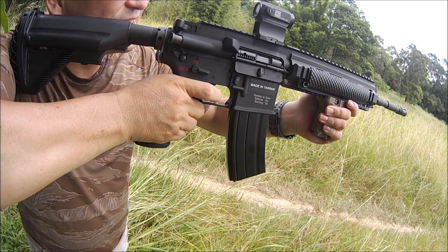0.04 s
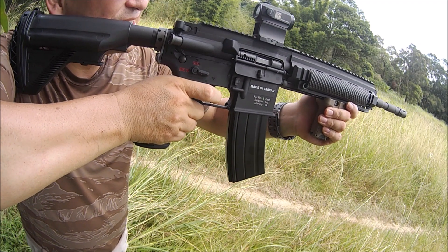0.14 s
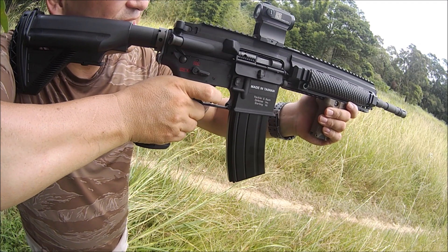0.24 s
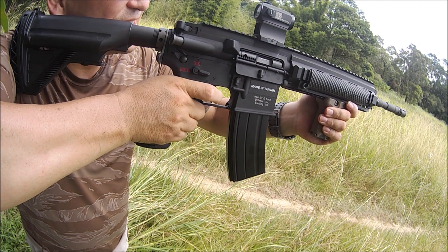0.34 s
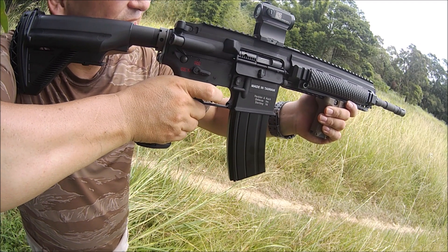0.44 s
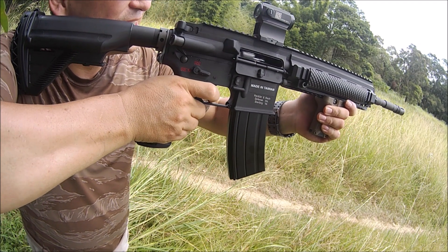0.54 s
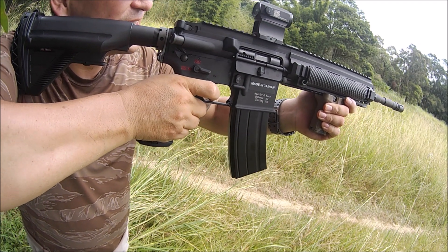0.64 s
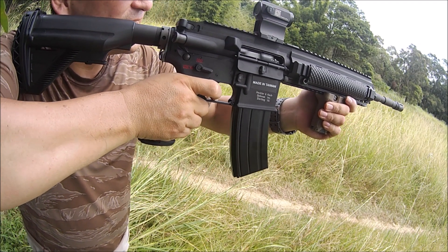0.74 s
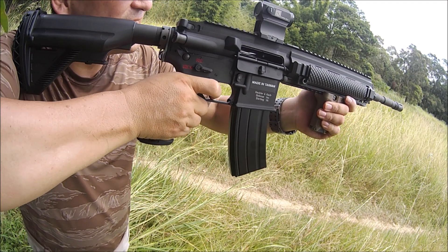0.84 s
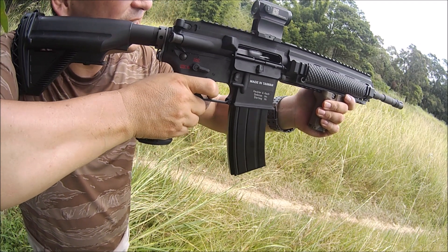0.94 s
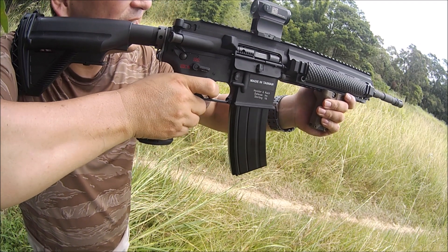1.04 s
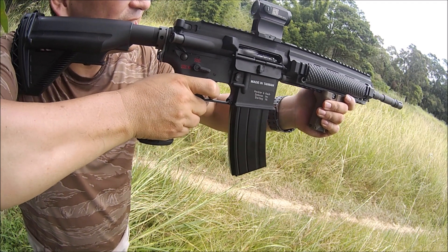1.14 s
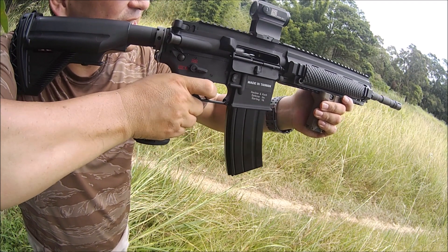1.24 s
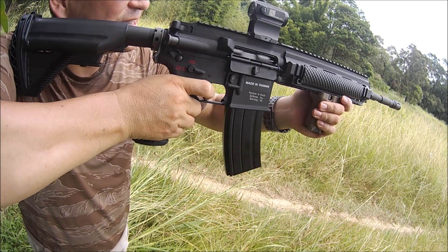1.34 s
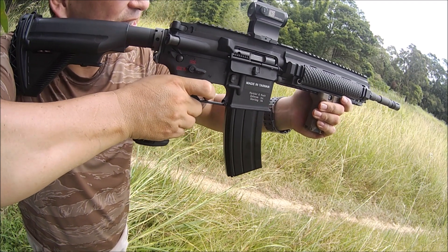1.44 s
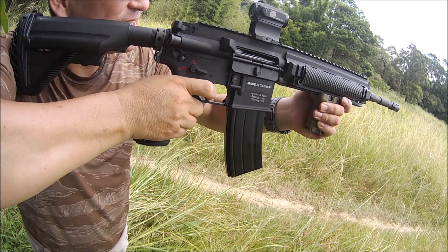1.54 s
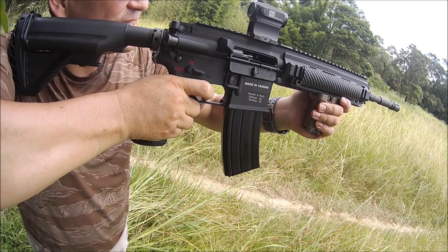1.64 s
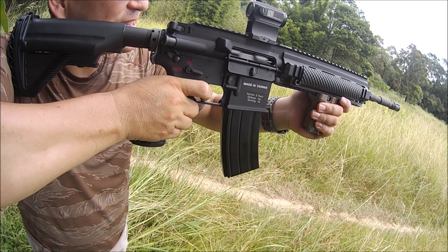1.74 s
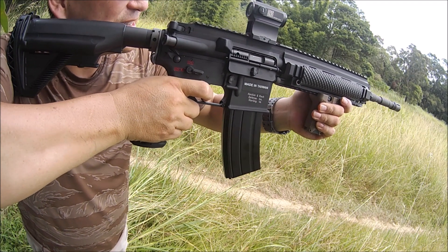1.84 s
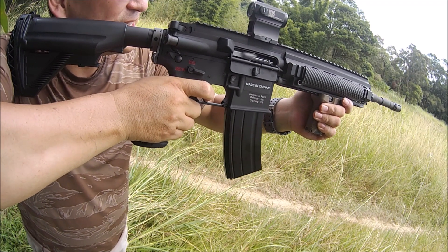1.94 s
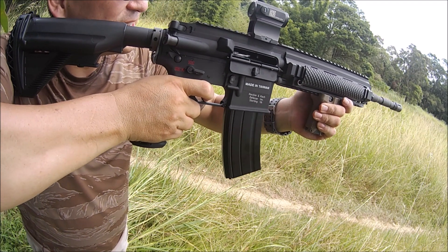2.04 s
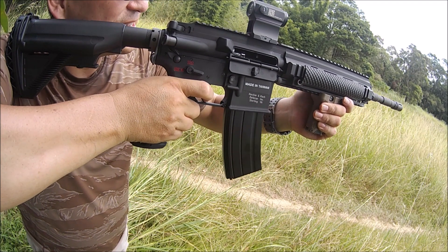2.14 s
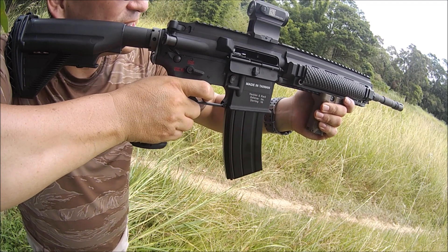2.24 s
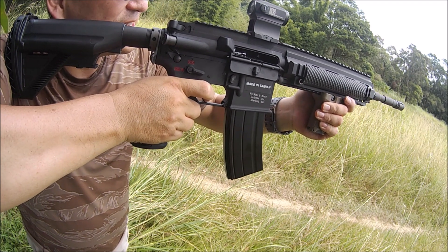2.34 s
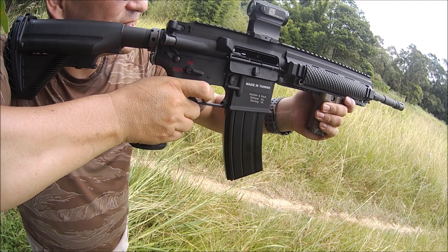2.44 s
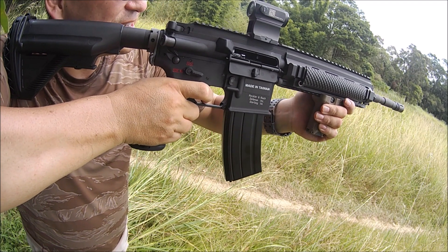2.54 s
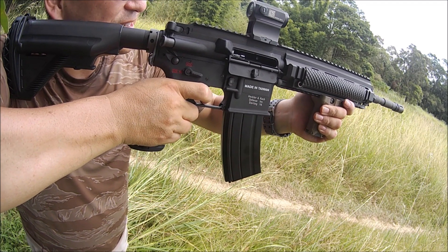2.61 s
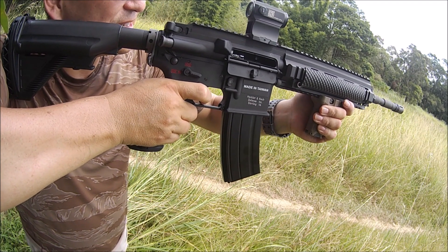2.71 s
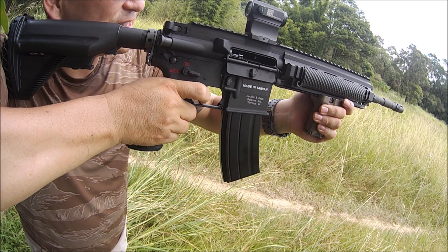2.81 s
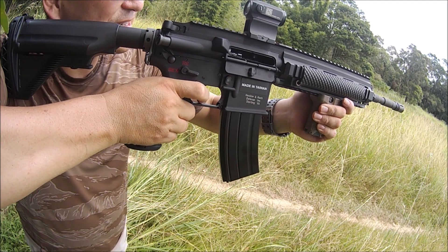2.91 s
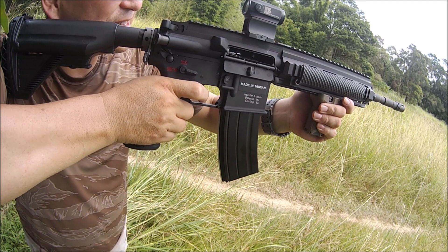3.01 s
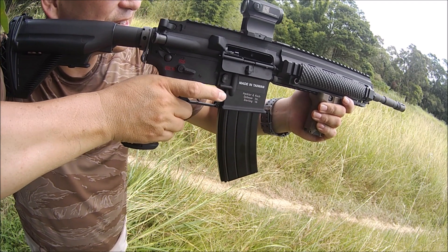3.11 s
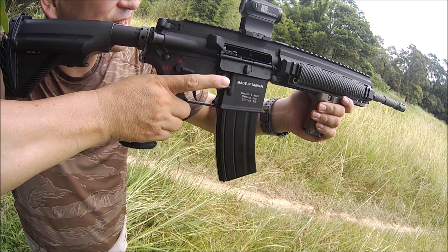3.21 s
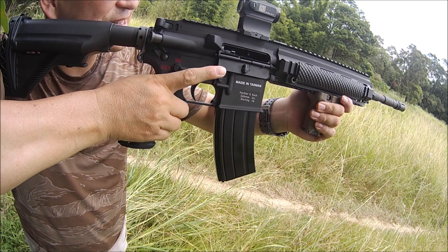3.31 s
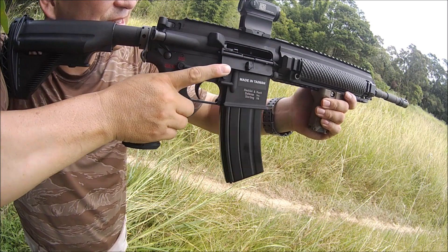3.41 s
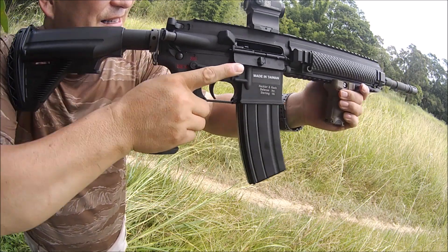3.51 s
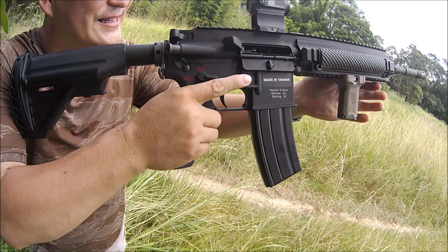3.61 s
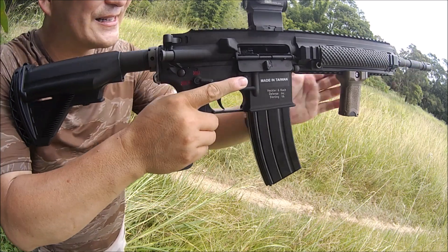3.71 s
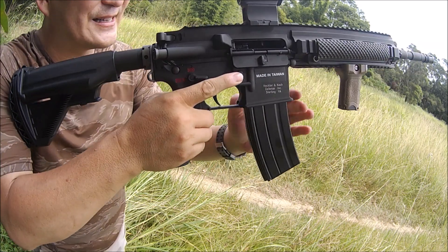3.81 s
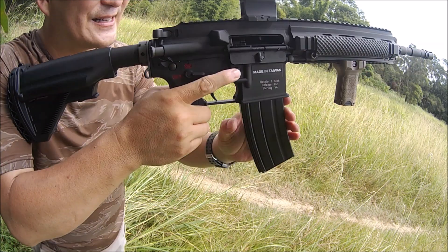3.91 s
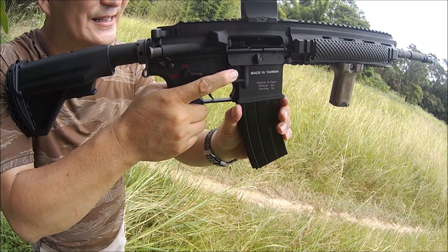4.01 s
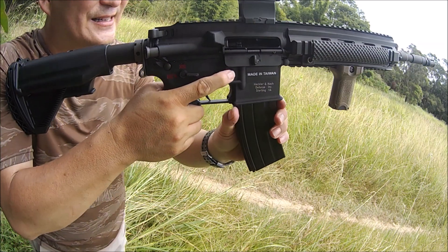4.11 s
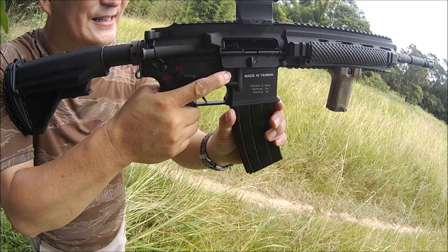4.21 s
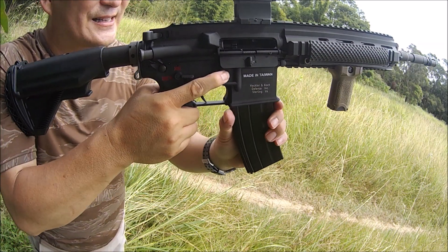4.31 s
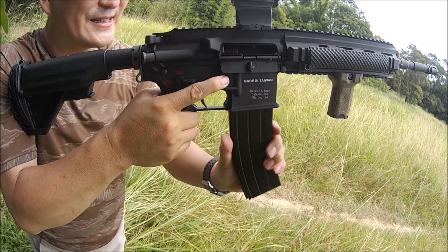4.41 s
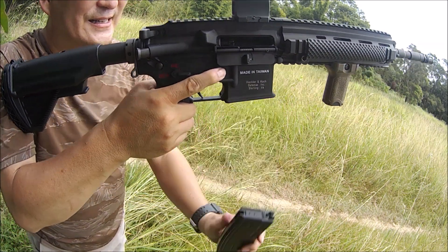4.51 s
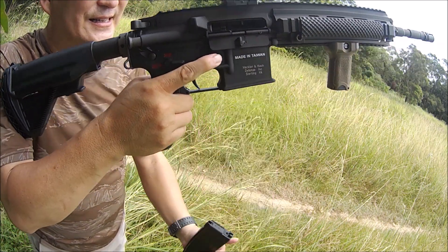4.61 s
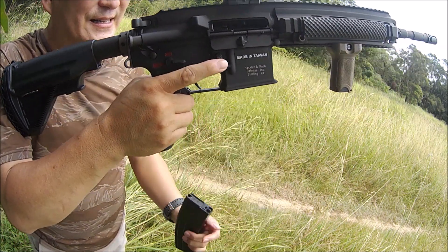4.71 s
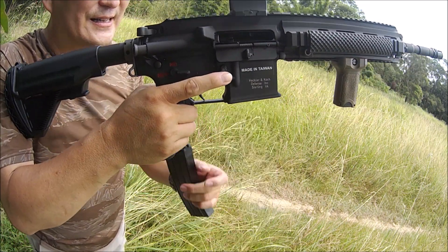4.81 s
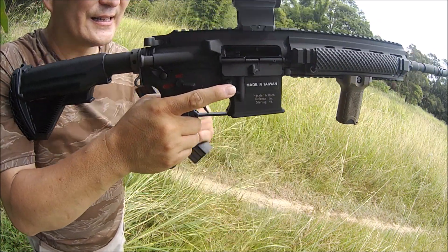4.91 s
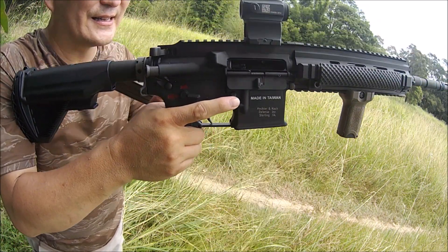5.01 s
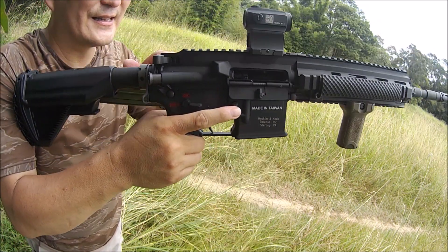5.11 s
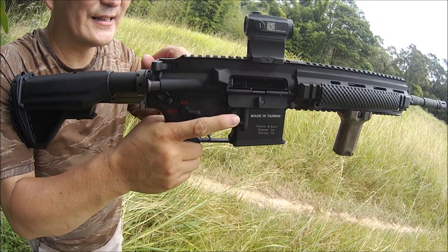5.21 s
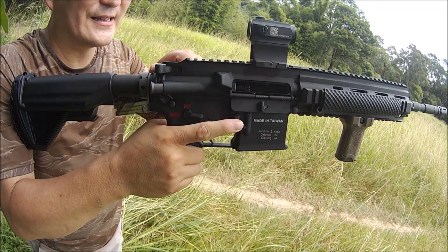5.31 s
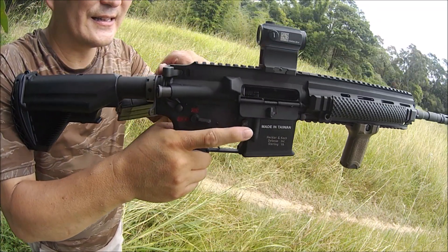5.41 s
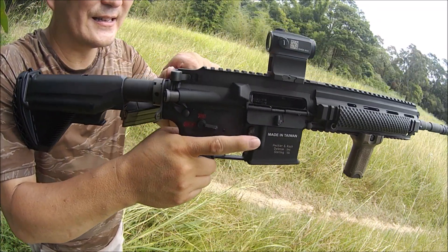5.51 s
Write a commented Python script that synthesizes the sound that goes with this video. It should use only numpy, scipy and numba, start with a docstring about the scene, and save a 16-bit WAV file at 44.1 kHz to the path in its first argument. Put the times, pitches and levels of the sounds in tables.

```python
"""A gas-driven airsoft rifle fires twenty rounds in one burst on a grassy hillside, until its magazine is empty.
Each round is noise shaped into a fixed run of metal blows that ring the body, plus a low puff of gas.
Then the magazine is pulled and the bolt worked by hand: short clicks made of filtered noise.
Behind are pulsed cicada tones, a far bird's short falling notes and a noise bed of wind and insects.
A gain control turns the level down under loud sounds and lets it return slowly."""
import sys
import numpy as np
from scipy import signal
from scipy.fft import rfft, irfft
from scipy.io import wavfile
from scipy.ndimage import uniform_filter1d
from numba import njit

SR = 44100
rng = np.random.default_rng(int(sys.argv[2]) if len(sys.argv) > 2 else 0)


def wrap_up_sound(samples):
    """Save the sound to the file named by the first command line argument, as 16-bit audio."""
    columns = np.atleast_2d(samples).T
    # keep every value between -1 and 1, then stretch to whole-number steps
    tamed = np.clip(columns, -1, 1)
    steps = np.round(tamed * 32767).astype(np.int16)
    wavfile.write(sys.argv[1], SR, steps)


N = 244755  # length in samples


def undb(db):
    """Turn dB into a gain."""
    return 10 ** (np.asarray(db) / 20)


def unit(x):
    """Scale a signal to an rms level of 1."""
    return x / np.sqrt(np.mean(x ** 2))


def noise():
    """Plain white noise, as long as the scene."""
    return rng.standard_normal(N)


def band(x, hz, width_hz):
    """One resonance, with gain 1 at its centre."""
    return signal.lfilter(*signal.iirpeak(hz, hz / width_hz, fs=SR), x)


def colour(x, points):
    """Filter that follows (Hz, dB) points and never sounds ahead of its input."""
    hz, db = np.transpose(points)
    grid_hz = np.linspace(1, SR / 2, 4097)
    log_gain = np.interp(np.log(grid_hz), np.log(hz), db) * np.log(10) / 20
    # fold the cepstrum onto positive times: this makes the filter minimum-phase
    cepstrum = irfft(log_gain)
    cepstrum[1:4096] *= 2
    cepstrum[4097:] = 0
    response = irfft(np.exp(rfft(cepstrum)))
    return signal.fftconvolve(x, response)[:N]


def walk(rate):
    """Smooth random wander with rms 1, given new values `rate` times a second."""
    k = int(SR / rate)
    steps = np.repeat(rng.standard_normal(N // k + 1), k)
    smooth = uniform_filter1d(uniform_filter1d(steps, k), k)
    return unit(smooth[:N])


def bursts(s, db, ms, edge_ms):
    """Envelope of many bursts: a quick rise, a sagging plateau of the given length, a quick fall."""
    out, t_ms = np.zeros(N + 2000), np.arange(2000) / SR * 1000
    for start, level_db, length in zip(s, db, np.maximum(ms, .3)):
        i = int(start * SR)
        rise = 1 - np.exp(-t_ms / edge_ms)
        sag = np.exp(-.8 * t_ms / length)
        fall = np.exp(-np.maximum(t_ms - length, 0) / edge_ms / 2)
        out[i:i + 2000] += undb(level_db) * rise * sag * fall
    return out[:N]


def linger(x, seconds):
    """Smear an envelope with a tail that dies away exponentially."""
    return signal.lfilter([1 / (seconds * SR)], [1, -np.exp(-1 / (seconds * SR))], x)


def field():
    """Wind in grass and a far insect chorus: noise whose half octaves flicker alone and swell together."""
    # Broad colour of the bed. Each row: frequency in Hz, level in dB per Hz.
    field_points = [(20, -29), (60, -6.5), (130, -12), (700, -23), (1800, -23), (3200, -7.5), (7000, -3),
                    (10100, -1), (12900, -19.5), (15500, -38.5)]
    level_db = -40
    bed = colour(noise(), field_points)
    swell_db = .7 * walk(6)
    bands = []
    for hz in 30 * 2 ** np.arange(0, 9.2, .5):
        flicker = undb(swell_db + 1.2 * walk(15))
        bands.append(flicker * band(bed, hz, hz / 2.8))
    return undb(level_db) * unit(sum(bands))


def cicadas():
    """A drum struck afresh many times a second, each ring starting anew; the pulse rate wavers a little."""
    # Each row is one cicada: song pitch in Hz, time constant of the ring's decay in ms, average level in dB.
    songs = [(10350, 1.8, -45), (9630, 0.82, -50.5)]
    # Average number of drum pulses a second (Hz), one for each cicada.
    pulse_rates = [125.45, 123.6]
    out = 0
    for (hz, ms, db), rate in zip(songs, pulse_rates):
        wavering_rate = rate * (1 + .0007 * walk(1.5) + .001 * walk(40))
        since = np.cumsum(wavering_rate) / SR % 1 / rate  # seconds since the last strike
        envelope = (since * rate) ** .5 * np.exp(-since * 1000 / ms)
        pulse = np.sin(2 * np.pi * hz * since) * envelope
        flicker_db = 1.1 * walk(4.1) + 1.5 * walk(60)
        out = out + undb(db + flicker_db) * unit(pulse)
    return out


def bird():
    """Short near-sine notes that fall in pitch, each a little different, smeared by the trees."""
    # Each row is one note: time in seconds (7 ms before its loudest point), level in dB, middle pitch in Hz.
    near_notes = [(0.032, -53, 993), (0.113, -56, 1135), (0.226, -52.5, 1040), (0.329, -52, 1056),
                  (0.467, -57.5, 1084), (2.295, -54, 990), (2.409, -53, 990), (2.505, -52, 1010),
                  (2.601, -51, 1076), (2.659, -52, 1100), (2.716, -50, 1166), (2.77, -51, 1170),
                  (2.827, -56, 1140), (2.941, -62.5, 1000), (3.075, -61.5, 950), (3.19, -61, 1123),
                  (3.293, -54, 1120), (3.385, -55, 1060), (3.47, -53, 1110), (3.539, -52.5, 1156),
                  (3.611, -53, 1000), (3.671, -53, 1010), (3.729, -53, 1070), (3.802, -53, 1030),
                  (3.85, -55, 1160), (3.941, -50.5, 1140), (4.031, -48.5, 1133), (4.216, -56.5, 1080),
                  (4.309, -51.5, 1225), (4.37, -51.5, 1170), (4.527, -54, 907), (4.761, -50, 984),
                  (4.823, -50, 1230), (4.859, -47, 1026), (4.944, -51, 1145), (5.041, -51, 1084)]
    # sixty faint notes of a second bird, with the same columns
    second_bird = rng.uniform((0, -68, 900), (5.1, -60, 1200), (60, 3))
    notes = np.vstack([second_bird, near_notes])
    variety = rng.uniform(.6, 1.3, (len(notes), 2))
    out, t = np.zeros(N + 3000), np.arange(3000) / SR - .014  # t is 0 at the loudest point
    for (s, db, hz), (fall, length) in zip(notes, variety):
        pitch = hz * np.exp(-fall * (11 * t + 200 * t ** 2))  # falls faster and faster
        phase = 2 * np.pi * np.cumsum(pitch) / SR
        i = max(int((s - .007) * SR), 0)
        out[i:i + 3000] += undb(db) * np.sin(phase) * np.exp(-(t / (.01 * length)) ** 2)
    smear = rng.standard_normal(5000) * np.exp(-np.arange(5000) / SR / .02)
    return out[:N] + undb(-28) * signal.fftconvolve(out, smear)[:N]


def handling():
    """Short clicks of catch and steel with a dull knock of the hollow body, each trailing off in a scrape."""
    # Magazine, catch and charging handle. Each row: start in seconds, click level in dB before the gains
    # below, dull part in dB against the click, treble in dB against the click, length in ms.
    contacts = [(3.034, -30.5, -27, -4, 1.7), (3.751, -40, 3, 5, 1.7), (4.1454, -24.5, -49, 4, 3.14),
                (4.386, -36, -22, -10, 3.2), (4.4363, -18, -38, -2, 1.8), (4.447, -32, -10, -3, 4.3),
                (4.4607, -20, -11.5, -9, 2.9), (4.6097, -11, -48, -10, 0.98), (4.668, -39, -20, -8, 2.6),
                (5.1194, -26, -8, -29, 3.4), (5.1326, -37, -1.5, -17, 6.3), (5.2926, -39, 8.5, -10, 1.76),
                (5.3363, -23.5, -26, -22, 3.1), (5.3484, -43.5, 10, -5, 1.9), (5.4546, -47, 3, -4, 3.2)]
    # Resonances of the hand-held parts. Each row: frequency in Hz, width in Hz, level in dB.
    click_modes = [(1610, 870, -3), (2380, 1540, -2.5), (3100, 1100, -8)]
    s, db, dull_db, treble_db, ms = np.transpose(contacts)
    grit = undb(2.5 * walk(1500))

    def rough(extra_db):
        """Gritty noise under the contacts' envelope and its scraping tail."""
        envelope = bursts(s, db + extra_db, ms, 1.0)
        return noise() * grit * (envelope + undb(1) * linger(envelope, 0.0079))

    click, knock, tick = rough(0), rough(dull_db), rough(treble_db)
    bright = sum(undb(d) * band(click, hz, width) for hz, width, d in click_modes)
    dull = band(knock, 774, 340) + band(knock, 430, 350)
    treble = band(band(tick, 7100, 8200), 5800, 8600)
    return undb(5.0) * bright + undb(17.5) * dull + undb(8.5) * treble


def action():
    """The rifle's cycle: light contacts and heavy slams as (s, dB, length ms), gas vents as (s, dB)."""
    # One row per round: bolt closes in seconds, closing in dB, hammer in dB, slam against the buffer in dB,
    # vent lag after the slam in ms, vent in dB; all levels come before the rifle's gains.
    # Before the first round the bolt already rests shut.
    rounds = [(0.5076, -65.5, -28, -9, 5.15, -15.5), (0.5885, -0.5, 1, 5.5, 7.5, -3.5),
              (0.6672, -0.5, 2.5, 9.5, 8.7, -9), (0.7456, -2, -1, 7, 3.7, -13.5),
              (0.8255, -8, 2.5, 8.5, 8, -12.5), (0.9047, -7, 1.5, 5.5, 3.7, -12.5),
              (0.9835, -7.5, -1, 6.5, 6.9, -19), (1.0616, -7, -2.5, 2, 8, -22),
              (1.1395, -6.5, -5.5, 0.5, 4.5, -18.5), (1.2181, -8.5, -3.5, 3.5, 7.2, -19.5),
              (1.2964, -9.5, -8.5, 3.5, 8, -22), (1.376, -10, -11, 0, 2.7, -13),
              (1.4552, -12, -10.5, 0, 6.1, -29), (1.5343, -13, -6, -1, 2, -18),
              (1.614, -14, -4, -5, 6.2, -23.5), (1.6954, -9.5, -9.5, -6, 3.5, -20),
              (1.7763, -12.5, -10, -5.5, 3.2, -23), (1.8588, -14, -8.5, -5, 2.1, -25.5),
              (1.941, -17, -8, -9, 5.7, -30), (2.0221, -14.5, -11.5, -8.5, 4.1, -26.5)]
    # The next three list the contacts of one round. Each row: delay in ms, level in dB against
    # its blow, length in ms before the stretch below.
    # Counted from closing: the bolt strips a pellet, rubs, shuts; the sear lets go.
    closing_steps = [(-17.5, -8, 3), (-12, -14.5, 5), (-0.5, 2, 4.46), (13.5, -2.5, 0.5)]
    # Counted from closing: the hammer swings, strikes the valve.
    hammer_steps = [(16.5, -9.5, 3), (20, -2, 4.73)]
    # Counted from the slam: the bolt scrapes back, hits the buffer, rebounds.
    slam_steps = [(-6, -12.5, 6.7), (0, 2.5, 2.72), (3.5, -6, 2.4)]
    # The trigger breaks; at the end the empty bolt catches open and settles twice.
    # Each row: start in seconds, level in dB before the rifle's gains, length in ms.
    ends = [(0.5175, -44.5, 2.6), (2.0756, -7, 2.34), (2.0895, -31, 1.5), (2.11, -42, 2)]
    slam_delay_ms, slowing_ms = 36, .22  # closing to slam; added each round as the gas cools
    fresh_stretch, fresh_rounds = 4.1, 0.89  # extra length of the first blows; rounds over which it fades
    scatter_ms, scatter_db = .5, 1.5

    s, close_db, hammer_db, slam_db, lag_ms, vent_db = np.transpose(rounds)
    k = np.arange(len(s))
    slam_s = s + (slam_delay_ms + slowing_ms * k) / 1000
    stretch = 1 + fresh_stretch * np.exp(-k / fresh_rounds)

    def play(at, level, steps):
        """Every round repeats the steps, never quite alike."""
        luck = rng.standard_normal((len(steps), 2, len(s)))
        played = []
        for (ms, db, length), (early_late, soft_loud) in zip(steps, luck):
            start = at + (ms + early_late * scatter_ms) / 1000
            played.append((start, level + db + soft_loud * scatter_db, length * stretch))
        return np.hstack(played)

    closing, hammer = play(s, close_db, closing_steps), play(s, hammer_db, hammer_steps)
    light = np.hstack([closing, hammer, np.transpose(ends)])
    return light, play(slam_s, slam_db, slam_steps), (slam_s + lag_ms / 1000, vent_db)


def rifle():
    """Blows crack and ring the metal body; loose parts rattle, the slope answers faintly, vented gas thumps."""
    # Modes of the metal body. Each row: frequency in Hz, level in dB,
    # time to die away by 60 dB in seconds.
    body_modes = [(1605, -0.5, 0.021), (3010, -13, 0.0054), (4435, -17.5, .01), (6720, -9.5, 0.003),
                  (7820, -5, 0.023), (9240, -8, 0.0035)]
    # Broad colour of a blow. Each row: frequency in Hz, level in dB per Hz.
    blow_colour = [(150, -23.5), (300, -3.5), (1000, -4), (3300, -9), (9000, -3), (15500, -17.5)]
    # A slow low swell follows the first shot.
    # One row: start in seconds, level in dB before the last gain, length in ms.
    first_swell = (.549, -3.3, 18)
    # Recoil spring, rung by each vent. One row: frequency in Hz, level in dB against the vent,
    # time to die away by 60 dB in seconds.
    spring = (360, 2, .15)
    near_db = 24  # last gain of the whole rifle: firing is very loud
    rise_ms = .8  # edge of a metal blow
    light_body_db = -7  # all blows but the slam move little of the heavy body
    rattle_low_hz = 890  # small loose parts carry little below this

    light_blows, heavy_blows, (vent_s, vent_db) = action()
    grit = undb(3.0 * walk(2000))  # many tiny contacts
    light = grit * bursts(*light_blows, rise_ms)
    heavy = grit * bursts(*heavy_blows, rise_ms)
    blow = light + heavy

    loose_parts = undb(-3 + 5.2 * walk(700)) * linger(blow, .012)
    slope_answer = undb(-29) * linger(blow, 0.037)
    high_pass = signal.butter(2, rattle_low_hz, "high", fs=SR)
    thin = signal.lfilter(*high_pass, noise() * (loose_parts + slope_answer + light))
    body = colour(noise() * (heavy + undb(light_body_db) * light) + thin, blow_colour)
    flat = np.std(colour(noise(), blow_colour))  # level of steady noise in this colour

    ring = 0
    for hz, db, t60 in body_modes:
        # each blow lands elsewhere and wakes the modes in a new balance
        woken = body * undb(3.5 * walk(50))
        ring = ring + undb(db) * band(woken, hz, np.log(1000) / np.pi / t60)

    vent = undb(13.5) * bursts(vent_s - .002, vent_db, np.full(len(vent_s), 2.0), 0.16)
    spring_hz, spring_db, spring_t60 = spring
    twang = undb(spring_db) * band(vent, spring_hz, np.log(1000) / np.pi / spring_t60)
    jolt = undb(-19 + 2.6 * walk(72)) * linger(blow, 0.00049)  # every blow shakes the air a little, too
    swell = bursts(*np.transpose([first_swell]), 1.0)
    thumps = swell - vent - jolt + twang
    metal = (undb(-0.5) * body + undb(1.5) * ring) / flat
    return undb(near_db) * (metal + thumps)


def scene():
    """Everything as it reaches the one microphone."""
    return (field() + cicadas() + bird() + handling() + rifle())[None]


@njit
def duck(x, top, attack, release, slope):
    """Gain control: follows the peaks up faster than it lets go, and turns down what exceeds `top`."""
    y, level = np.empty(len(x)), 0.
    for i in range(len(x)):
        size = abs(x[i])
        level += (size - level) * (attack if size > level else release)
        y[i] = x[i] * (top / max(level, top)) ** slope
    return y


def record(dry):
    """Bass cut that swings each thump back, gain control, hard clipping, steep top cut."""
    top_hz = 15690
    attack_s, release_s = 0.059, .24
    bass_cut = signal.butter(1, 25, "high", fs=SR, output="sos")
    top_cut = signal.ellip(8, .2, 45, top_hz, fs=SR, output="sos")
    heard = signal.sosfilt(bass_cut, dry[0])
    held = duck(heard, float(undb(-20)), 1 / (attack_s * SR), 1 / (release_s * SR), 0.82)
    clipped = np.clip(held, -.97, .97)
    return signal.sosfilt(top_cut, clipped)[None]


dry = scene()
out = record(dry)
wrap_up_sound(out)
```